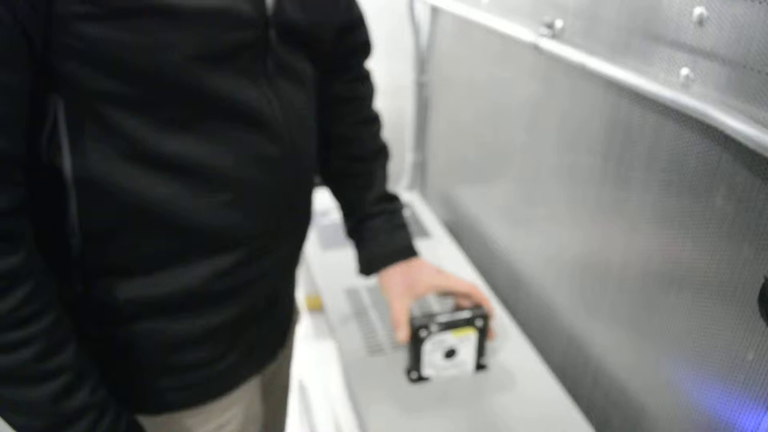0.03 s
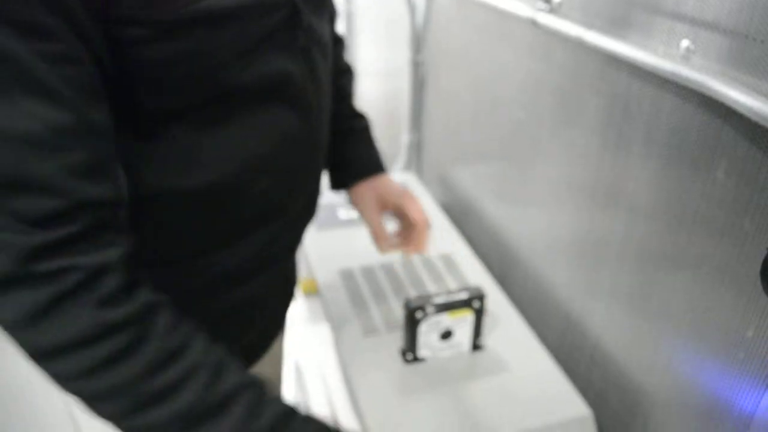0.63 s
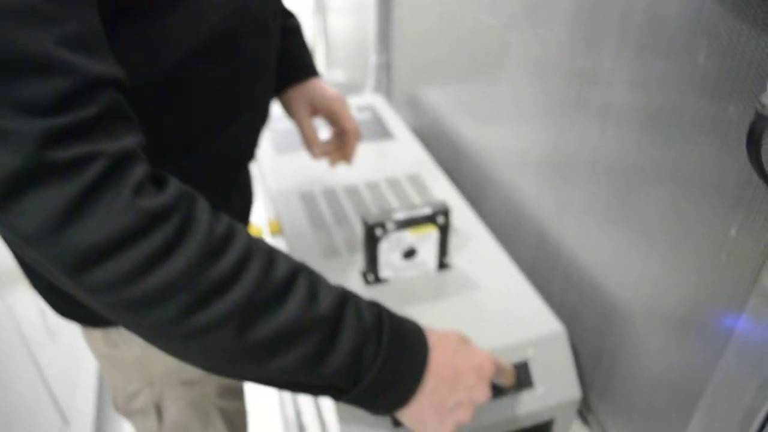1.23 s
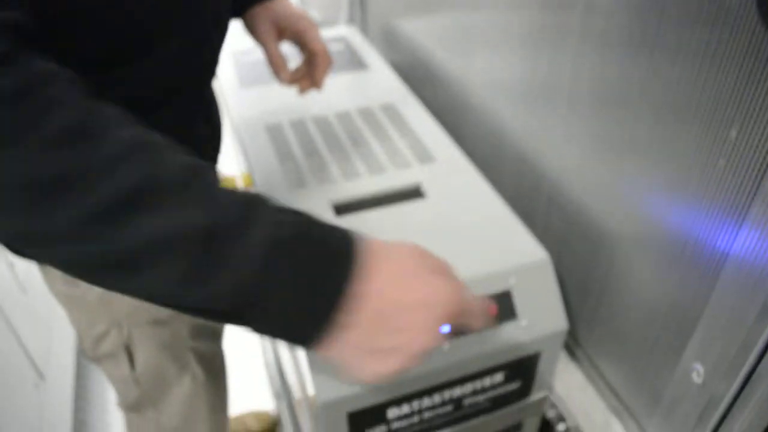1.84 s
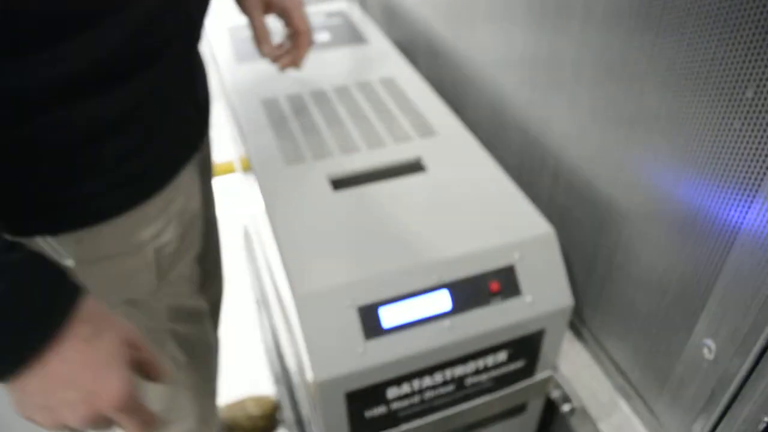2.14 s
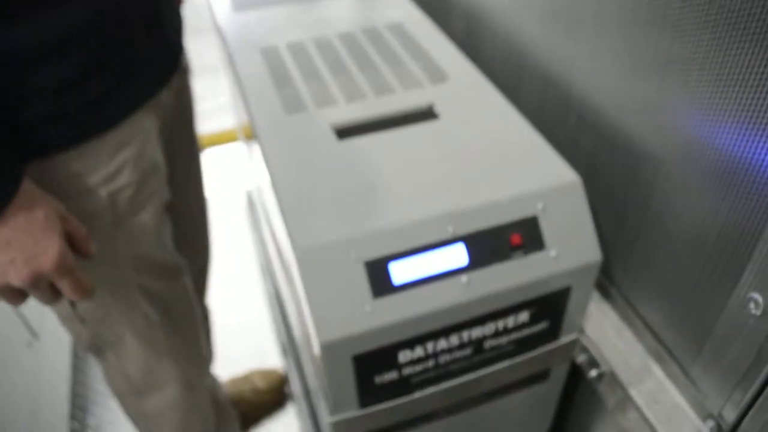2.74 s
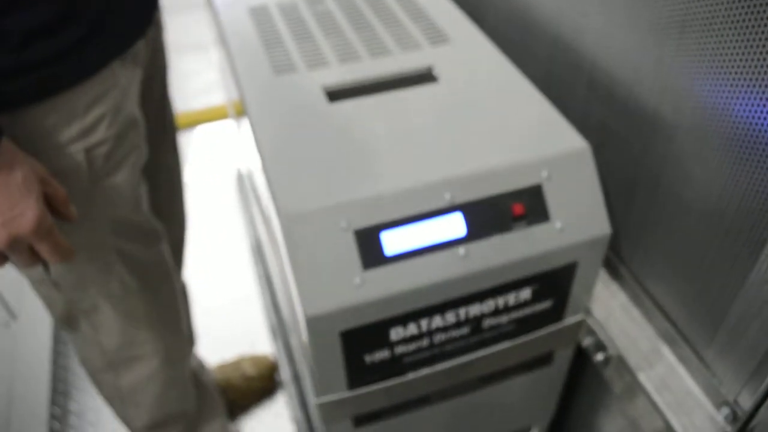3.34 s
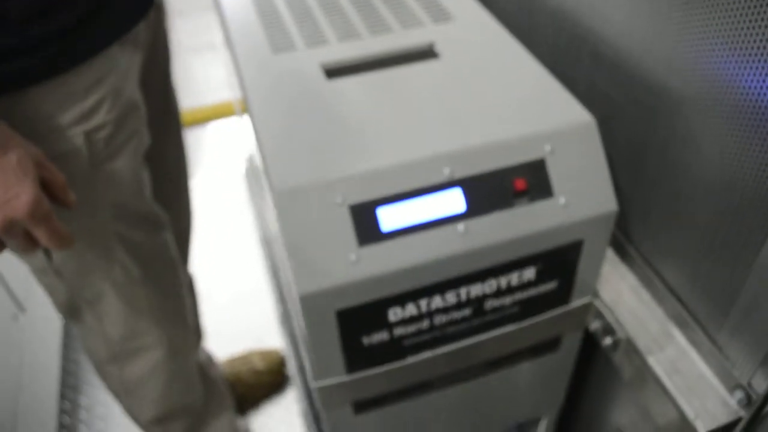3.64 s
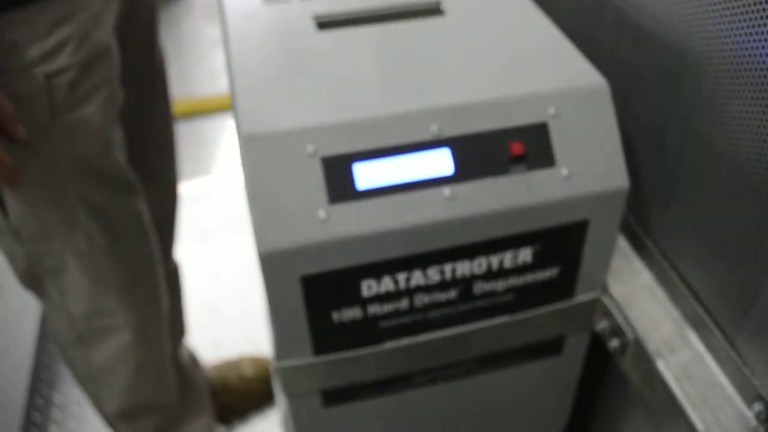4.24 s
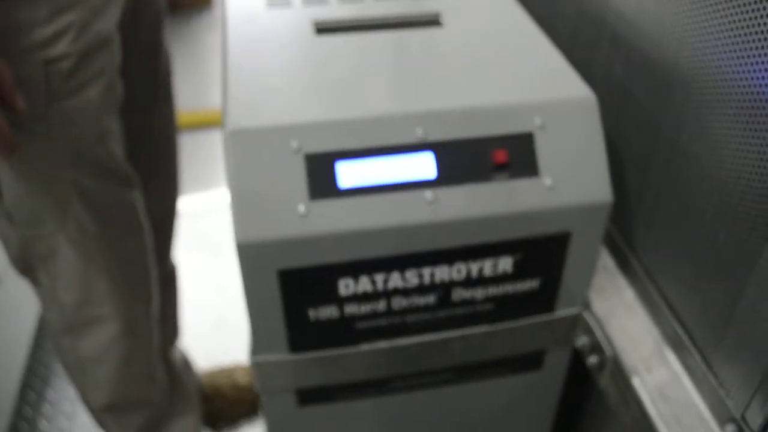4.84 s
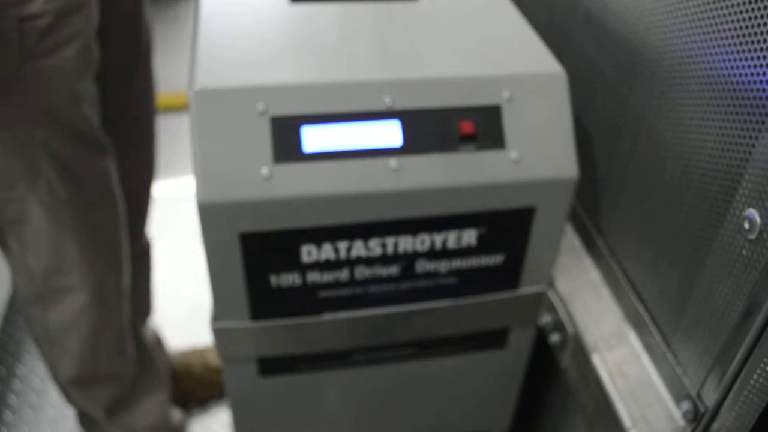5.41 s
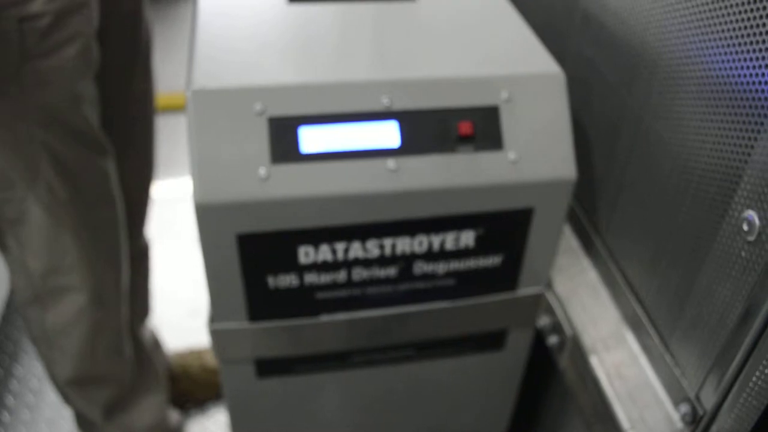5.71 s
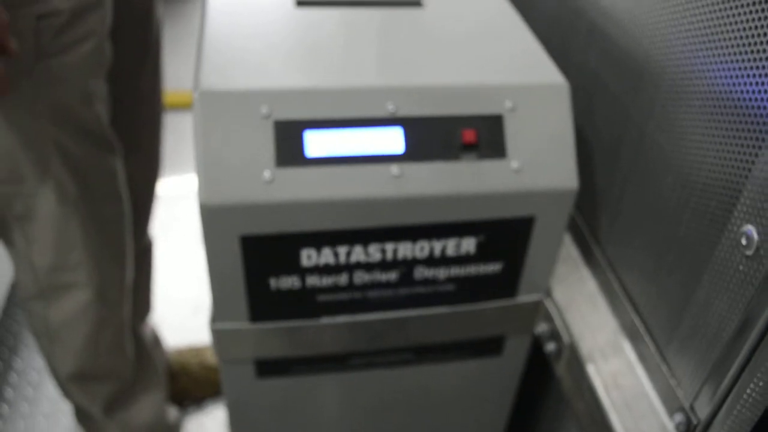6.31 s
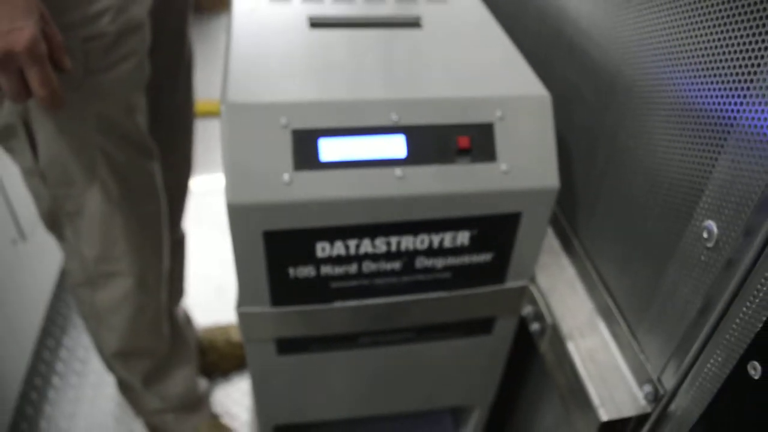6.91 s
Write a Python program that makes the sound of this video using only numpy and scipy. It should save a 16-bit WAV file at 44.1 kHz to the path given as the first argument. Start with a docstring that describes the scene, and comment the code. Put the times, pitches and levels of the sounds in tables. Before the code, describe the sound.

A hard drive clatters into a machine, then a thin rising whistle and a metallic bang, over a droning generator and fans.

```python
"""A hard drive goes through a degausser, heard from close by inside the steel box of a truck.
A switch clicks, the drive rattles down the slot, knocks a flap open and lands hard; a charger
whistles upward and the magnet coil fires with a bang. Behind it a generator engine drones and fans
rush. The microphone drifts some 30 cm along the machine, through the standing waves of the box;
the recorder fades in, ducks after the blows and clips."""
import sys
import numpy as np
from scipy import signal
from scipy.fft import rfft, irfft
from scipy.io import wavfile

SR = 44100
rng = np.random.default_rng(int(sys.argv[2]) if len(sys.argv) > 2 else 0)


def file_out(sig):
    """Save sig as 16-bit WAV at sys.argv[1]."""
    # one column per channel
    cols = np.atleast_2d(sig).T
    # limit, then scale
    lim = np.clip(cols, -1, 1)
    pcm = np.round(lim * 32767).astype(np.int16)
    wavfile.write(sys.argv[1], SR, pcm)


N = 315756

# the microphone's drift along the machine: time_s, place_m
MIC_PATH = [(0.4, 0.0), (1.5, 0.072), (2.3, 0.118), (3.4, 0.174), (4.4, 0.253), (5.5, 0.291), (7.1, 0.277)]


def amp(db):
    """Decibels to gain."""
    return 10 ** (np.asarray(db) / 20)


def unit(x):
    """Scales to rms 1."""
    return x / np.sqrt(np.mean(x ** 2) + 1e-20)


def at_hz(points, hz):
    """Reads a table over frequency on a log axis."""
    points_hz, values = np.transpose(points)
    return np.interp(np.log(hz + 1), np.log(points_hz + 1), values)


def curve(rows):
    """The value of a time table at every sample."""
    times_s, values = np.transpose(rows)
    return np.interp(np.arange(N) / SR, times_s, values)


def wander(rate_hz):
    """Random drift of rms 1, mostly slower than rate_hz."""
    coarse = rng.standard_normal(2048)
    hz = np.fft.rfftfreq(len(coarse), N / SR / len(coarse))
    slow = unit(irfft(rfft(coarse) / (1 + (hz / rate_hz) ** 2)))
    return np.interp(np.linspace(0, len(slow) - 1, N), np.arange(len(slow)), slow)


def add(mix, start_s, sound):
    """Lays a sound into the mix."""
    part = mix[round(start_s * SR):][:len(sound)]
    part += sound[:len(part)]


def snap(gain_db):
    """Impulse response of energy 1 with a sharp front and the given spectral shape."""
    log_gain = np.log(amp(np.r_[gain_db, gain_db[-2:0:-1]]))
    minimum_phase = np.exp(np.conj(signal.hilbert(log_gain)))
    taps = np.fft.ifft(minimum_phase).real
    return taps / np.linalg.norm(taps)


def ring(modes):
    """Dying sines of a struck body, with energy 1."""
    t = np.arange(SR // 2) / SR
    sound = sum(amp(db - 60 * t / t60_s) * np.sin(2 * np.pi * (hz * t + rng.random()))
                for hz, db, t60_s in modes)
    return sound / np.linalg.norm(sound)


def box_echo():
    """Dense reflections between close steel walls, each band dying at its own speed."""
    # reverberation of the truck box: band_hz, t60_s
    decay = [(100, 0.17), (1000, 0.26), (2000, 0.16), (5000, 0.11), (10000, 0.094), (16000, 0.1)]
    hz, t, bands = signal.stft(rng.standard_normal(SR // 2), SR, nperseg=128)
    fade = amp(-60 * t / at_hz(decay, hz)[:, None])
    tail = signal.istft(bands * fade, SR)[1][:SR // 2]
    return tail / np.linalg.norm(tail)


def thin_whine(pitch_hz=15683, level_db=-64):
    """A faint, steady, very high electronic tone."""
    return amp(level_db) * np.sqrt(2) * np.sin(2 * np.pi * pitch_hz * np.arange(N) / SR)


def fans(level_db=-27.5, split_hz=5000, flicker_db=0.95, body_db_per_m=-11, treble_db_per_m=-20):
    """Moving air fades as the microphone drifts away, its more directional treble faster."""
    # spectrum of the cooling fans: band_hz, relative_db
    rush = [(20, -25), (45, -5), (120, 2), (230, 7), (450, -0.5), (650, -3), (1000, -7.5), (1800, -9.5),
            (2750, -15.5), (3150, -13.5), (3700, -19), (6500, -31), (8500, -29.5), (10300, -25.5),
            (12500, -36.5), (15500, -49)]
    hz = np.fft.rfftfreq(N, 1 / SR)
    air = unit(irfft(rfft(rng.standard_normal(N)) * amp(at_hz(rush, hz)), N))
    treble = irfft(rfft(air) * hz ** 4 / (hz ** 4 + split_hz ** 4), N)
    place_m = curve(MIC_PATH)
    at_mic = (air - treble) * amp(body_db_per_m * place_m) + treble * amp(2 + treble_db_per_m * place_m)
    return at_mic * amp(level_db + flicker_db * wander(5.1))


def standing_wave(place_m, hz, node_m, node_gain, sound_m_per_s=343):
    """Strength at a place in the box: 1 at the crests, node_gain at nodes half a wavelength apart."""
    angle = 2 * np.pi * (place_m - node_m) * hz / sound_m_per_s
    return np.hypot(np.sin(angle), node_gain * np.cos(angle))


def shaft_order(turns, order, phase_spread=0.099):
    """One order as a sine; its phase is offset by the order squared, softening the throb into a buzz."""
    # half orders lie a quarter cycle off, so that alternate turns throb about equally hard
    offset = order % 1 / 2
    return np.sqrt(2) * np.sin(2 * np.pi * (order * turns - phase_spread * order ** 2 + offset))


def engine(shaft_hz=30.715, strong_flutter=0.02, weak_flutter=0.1, weak_db=-1):
    """The generator throbs once a turn; its strong orders dip as the microphone passes their nodes."""
    # orders that stand as waves in the box: shaft_multiple, crest_db, node_m, node_gain
    strong_orders = [(2.0, -28.1, 0.493, 0.1), (4.0, -24.0, -0.465, 0.6), (6.0, -15.6, 0.241, 0.25),
                     (7.0, -23.9, -0.166, 0.05), (8.0, -24.3, 0.144, 0.6), (9.0, -30.5, 0.312, 0.7),
                     (10.0, -22.0, 0.124, 0.25), (12.0, -27.3, 0.19, 0.8), (13.0, -22.5, 0.091, 0.05),
                     (13.5, -33.2, 0.023, 0.3), (14.0, -22.0, 0.081, 0.4), (15.0, -29.9, 0.306, 0.35),
                     (15.5, -34.1, -0.035, 0.15), (16.0, -37.1, 0.248, 0.05), (17.0, -35.2, 0.264, 0.2),
                     (23.0, -40.9, 0.141, 0.05)]
    # weaker orders, the halves from the four-stroke cycle: shaft_multiple, relative_db
    weak_orders = [(2.5, -40), (3, -39), (3.5, -33.5), (4.5, -43), (5, -48), (5.5, -43), (6.5, -41),
                   (7.5, -44), (8.5, -39), (9.5, -42), (10.5, -44), (11.5, -43), (12.5, -39), (14.5, -42),
                   (16.5, -44), (21, -46), (25, -49), (26, -45), (27, -50), (28, -46), (34, -48), (36, -49),
                   (38, -53), (40, -52), (46, -53)]
    turns = np.cumsum(shaft_hz + 0.02 * wander(0.7)) / SR
    place_m, out = curve(MIC_PATH), np.zeros(N)
    for order, db, node_m, node_gain in strong_orders:
        level = amp(db) * standing_wave(place_m, order * shaft_hz, node_m, node_gain)
        out += level * (1 + strong_flutter * wander(3.5)) * shaft_order(turns, order)
    for order, db in weak_orders:
        level = amp(db + weak_db) * (1 + weak_flutter * wander(0.36))
        out += level * shaft_order(turns + rng.random(), order)
    return out


def tinks(taps, modes, gain_db, echo_db):
    """A small metal part rings briefly into the box; a tap's tilt brings out its high modes."""
    out = np.zeros(N)
    for start_s, db, tilt_db in taps:
        tink = ring([(hz, mode_db + tilt_db * np.log2(hz), t60_s) for hz, mode_db, t60_s in modes])
        echo = signal.fftconvolve(tink, box_echo())[:len(tink)]
        add(out, start_s, amp(db + gain_db) * (tink + amp(echo_db) * echo))
    return out


def switch_ticks():
    """The switch and loose parts give small metal ticks."""
    # the ticks: start_s, relative_db, tilt_db_per_octave
    taps = [(1.363, -25.5, 7), (1.462, -21, -1), (4.70, -30.5, 0), (6.392, -30.5, 5)]
    # their ring: pitch_hz, relative_db, t60_s
    modes = [(2170, -1, .09), (2228, 6, .1), (2330, -11, .07), (2750, -7, .06), (5370, -14, .06),
             (7750, -20, .1)]
    return tinks(taps, modes, gain_db=19, echo_db=-2)


def chute_flap():
    """A flap in the chute is knocked open and rings."""
    # the knock: start_s, relative_db, tilt_db_per_octave
    taps = [(1.829, -16, 0)]
    # ring of the flap: pitch_hz, relative_db, t60_s
    modes = [(1080, 2, 0.13), (3840, -15, 0.11), (4800, -7, .14), (5609, -8, .1), (10900, -16, .08)]
    return tinks(taps, modes, gain_db=23.5, echo_db=-7)


def charger(start_s=3.015, tau_s=1.45, full_hz=26913, overtone_db_per_octave=-7, gain_db=-4.5):
    """The switching rate follows the filling capacitor's voltage: a whistle climbs out of hearing."""
    # how loudly the transformer radiates: pitch_hz, relative_db
    radiation = [(2000, -85), (7000, -66), (8500, -54), (9500, -41.5), (10500, -40), (12000, -46.5),
                 (13500, -54), (15800, -56)]
    charging_s = np.maximum(np.arange(N) / SR - start_s, 0)
    hz = full_hz * (1 - np.exp(-charging_s / tau_s))
    phase = 2 * np.pi * np.cumsum(hz) / SR
    whistle = np.zeros(N)
    for k in range(1, 5):
        level = amp(at_hz(radiation, k * hz) + overtone_db_per_octave * np.log2(k))
        whistle += level * (k * hz < SR / 2) * np.sin(k * phase)
    # echoes off the nearest walls make the sweep flicker
    walls = sum(np.roll(whistle, round(delay_s * SR)) for delay_s in rng.uniform(0.001, 0.008, 4)) / 2
    echo = signal.fftconvolve(whistle, box_echo())[:N]
    return amp(gain_db) * (whistle + amp(2) * walls + 0.5 * echo)


def strikes(blows, colour, modes, gain_db, ring_db, direct_db, grind, damped_s=(0, 0), damp_db=0):
    """Each contact snaps, chatters, rings the metal and fills the box; within damped_s it rings less."""
    hz, t = np.fft.rfftfreq(2048, 1 / SR), np.arange(SR // 16) / SR
    octaves = np.log2(np.maximum(hz, 500) / 2000)
    metal, out = ring(modes), np.zeros(N)
    for start_s, db, tilt_db, contact_s in blows:
        damped = damped_s[0] < start_s < damped_s[1]
        response = box_echo() + amp(ring_db + damp_db * damped) * metal
        response[0] += amp(direct_db)
        chatter = rng.standard_normal(len(t)) * np.exp(-t / contact_s)
        chatter *= grind / np.linalg.norm(chatter)
        chatter[0] = 1  # the first touch
        clack = snap(at_hz(colour, hz) + tilt_db * octaves)
        force = signal.fftconvolve(chatter / np.linalg.norm(chatter), clack)
        add(out, start_s, amp(db + gain_db) * signal.fftconvolve(response, force))
    return out


def magnet_bang():
    """The magnet pulse jolts the coil and rings its housing."""
    # the jolts: start_s, relative_db, tilt_db_per_octave, contact_s
    jolts = [(3.4345, -9.5, -2, 0.0016), (3.4412, -11, .5, 0.0057)]
    # spectrum of a jolt: band_hz, relative_db
    colour = [(100, -9), (500, -10), (850, 2.5), (1200, 2), (1850, 0.5), (2500, -5.5), (4500, -7),
              (7000, -20.5), (10300, -12.5), (13000, -29), (15500, -37)]
    # ring of the housing: pitch_hz, relative_db, t60_s
    modes = [(863, 8, 0.25), (988, -1, .2), (1070, -4, 0.34), (1177, 1, .28), (1290, -5, 0.27),
             (1530, 1, 0.15), (1780, -8, .13), (1870, 7, .11), (2350, -4, .11), (3550, -8, 0.11)]
    return strikes(jolts, colour, modes, gain_db=25, ring_db=-9, direct_db=-22, grind=1.1)


def falling_drive():
    """The drive rattles down the slot, damping the steel as it slides against it, then lands hard."""
    # blows on the steel case: start_s, relative_db, tilt_db_per_octave, contact_s
    blows = [(1.456, -18.5, 1, 0.01), (1.649, -15.5, 2.5, .005), (1.660, -9.5, -1, 0.016),
             (1.673, -12, -4.5, .0073), (1.684, -6.5, 3.5, 0.0034), (1.699, -15, -3, 0.011),
             (1.713, -12, 2.5, 0.014), (1.7613, -11, 1, 0.0042), (1.828, -13.5, -4.5, .006),
             (1.8551, 5, 0.9, 0.0041), (1.866, 1, 2.5, 0.0025), (1.939, -4.5, -1.8, 0.002),
             (1.970, -11, -2, .0053)]
    # spectrum of a blow: band_hz, relative_db
    colour = [(100, -11), (450, -6), (700, -4), (1050, 2), (1600, 1.5), (2400, 2.5), (3200, -2), (4400, -2),
              (6500, -6.5), (8000, -7), (10000, -4), (12500, -17), (15500, -32)]
    # ring of the case and its chute: pitch_hz, relative_db, t60_s
    modes = [(767, -2, 0.11), (1080, -10, 0.28), (1203, -16, .25), (1364, -2, 0.1), (1610, 0, 0.14),
             (1610, 0, 0.15), (2434, -1, 0.09), (2800, -11, .12), (2790, -9, 0.21), (3200, -9, .1),
             (4550, 10.5, 0.039), (4650, -8, 0.076), (4750, -10, 0.11), (5430, 1, 0.087), (5910, -1, 0.093),
             (8750, 0, 0.1), (9300, -11, 0.09), (10100, -7, .07), (10200, 2, .07), (10640, -10, 0.073)]
    return strikes(blows, colour, modes, gain_db=23.5, ring_db=-7.5, direct_db=-14, grind=0.98,
                   damped_s=(1.64, 1.78), damp_db=-21)


def scene():
    """One microphone beside the degausser, with engine and fans behind it."""
    knocks = falling_drive() + magnet_bang() + switch_ticks() + chute_flap()
    return (knocks + engine() + fans() + charger() + thin_whine())[None]


def record(dry, threshold_db=-11, squeeze=0.65, release_db_per_s=35, edge_hz=15950):
    """The recorder fades in, ducks after loud blows, clips the peaks and cuts the highest treble."""
    t = np.arange(N) / SR
    fade_in = np.interp(t, [0.035, 0.375], [amp(-17), 1], left=0)
    power = signal.lfilter(*signal.butter(1, 10, fs=SR), dry[0] ** 2)
    over_db = np.maximum(10 * np.log10(power + 1e-12) - threshold_db, 0)
    held_db = np.maximum.accumulate(over_db + release_db_per_s * t) - release_db_per_s * t
    clipped = np.clip(dry * fade_in * amp(-squeeze * held_db), -1, 1)
    lowpass = signal.firwin(511, edge_hz, window=("kaiser", 9), fs=SR)
    return signal.oaconvolve(clipped, lowpass[None], "same")


dry = scene()
out = record(dry)
file_out(out)
```